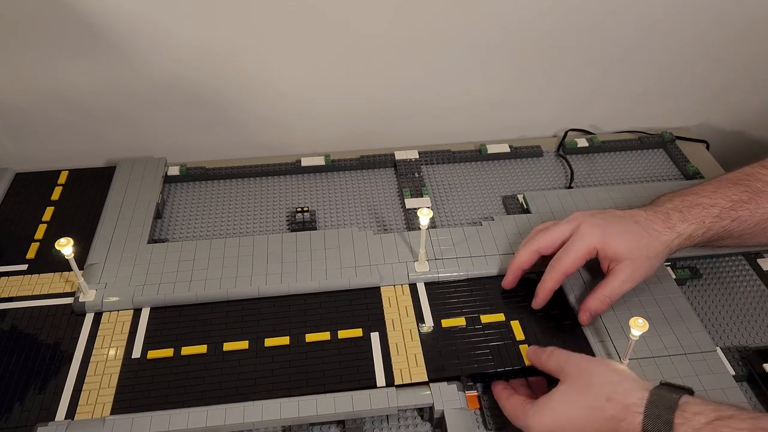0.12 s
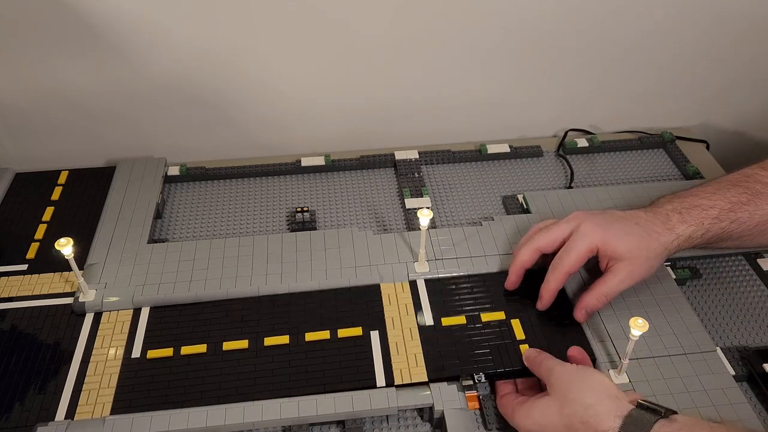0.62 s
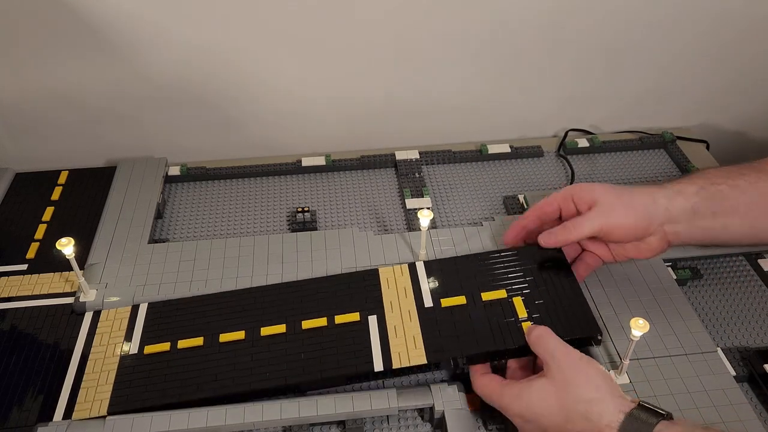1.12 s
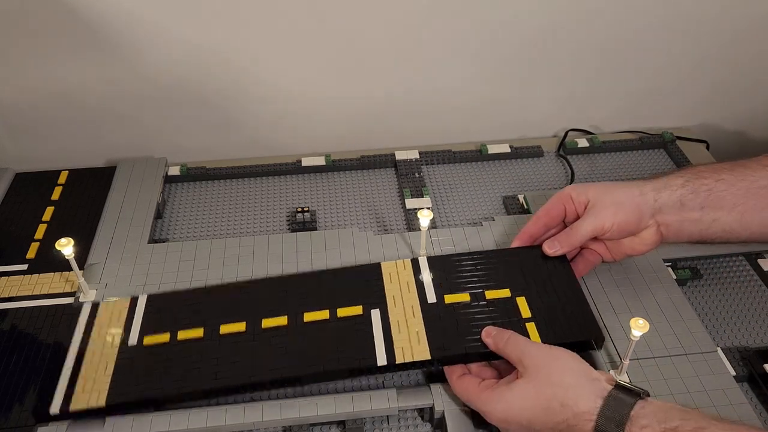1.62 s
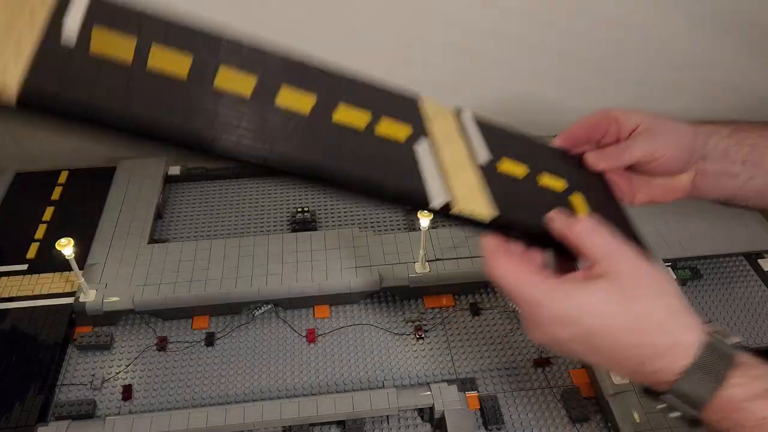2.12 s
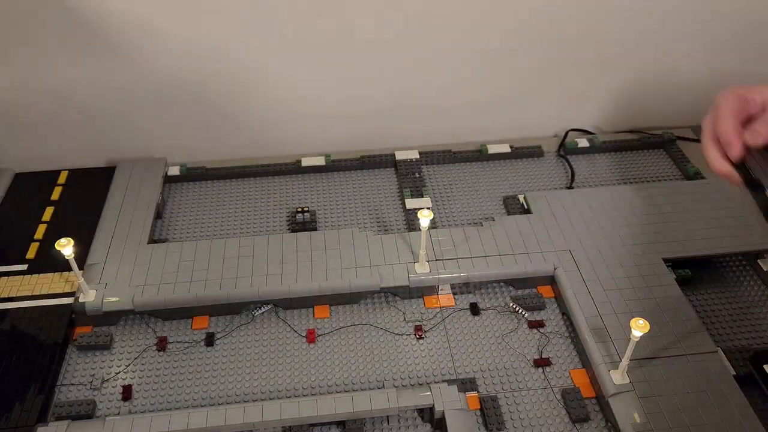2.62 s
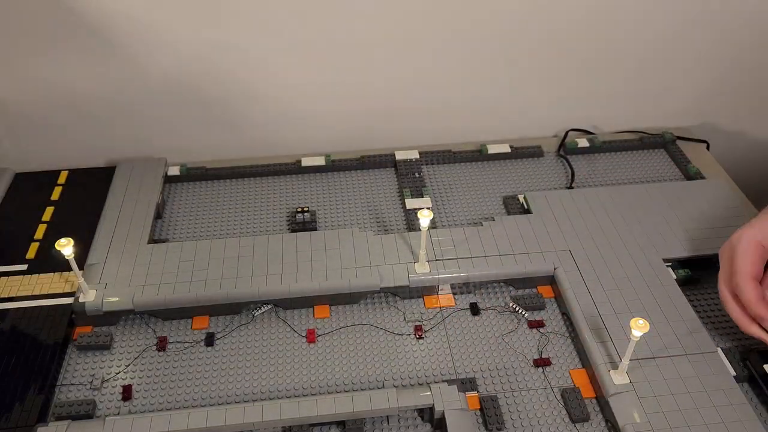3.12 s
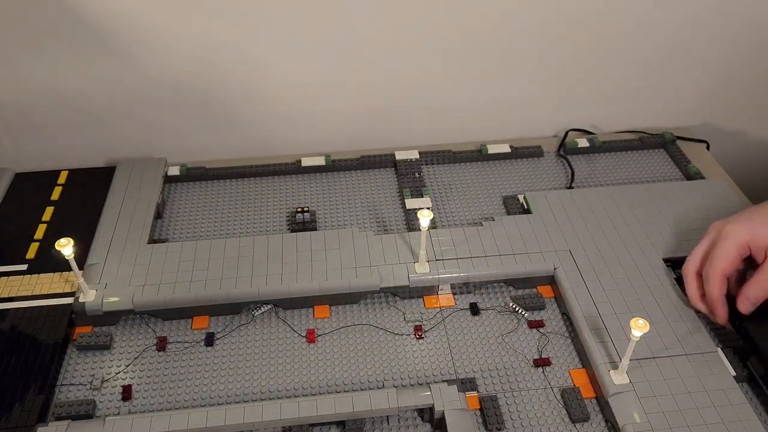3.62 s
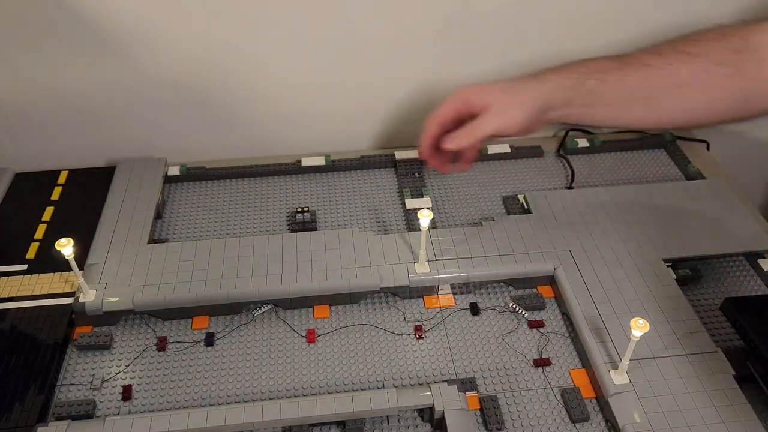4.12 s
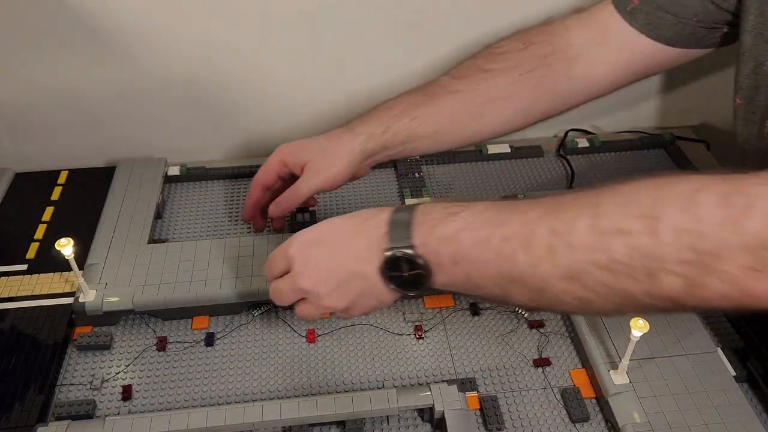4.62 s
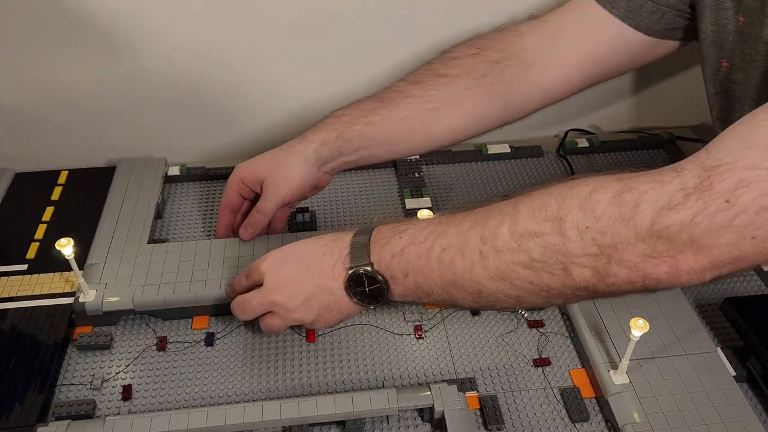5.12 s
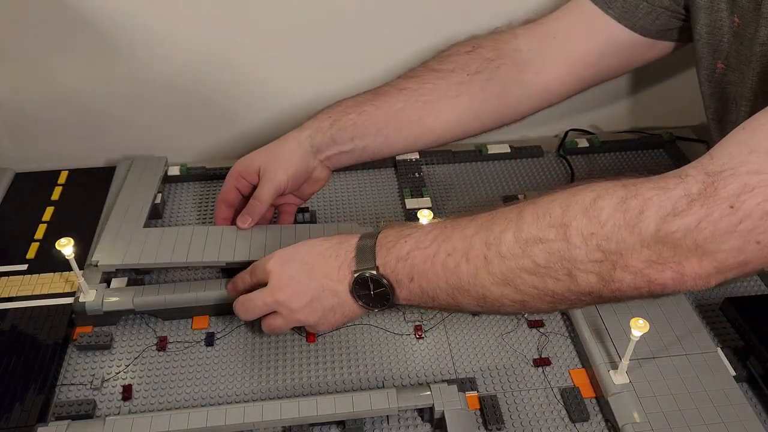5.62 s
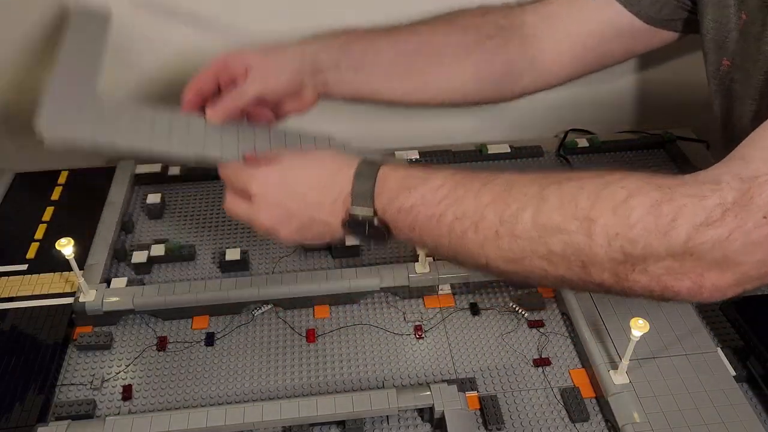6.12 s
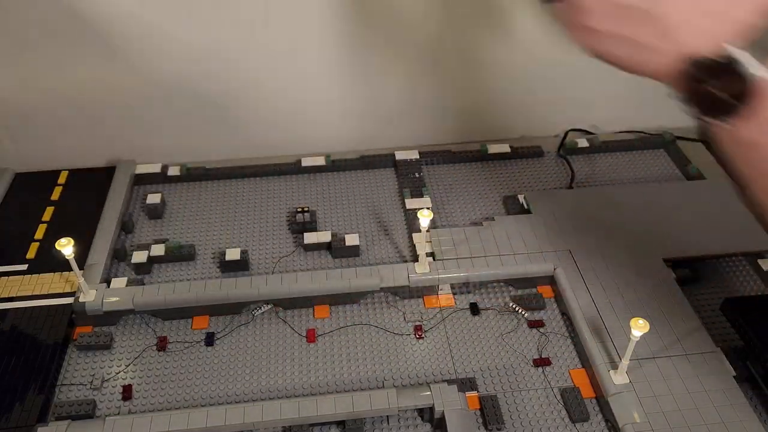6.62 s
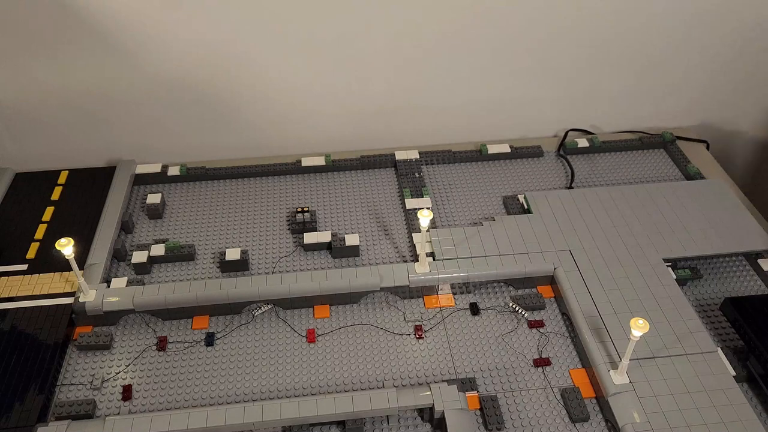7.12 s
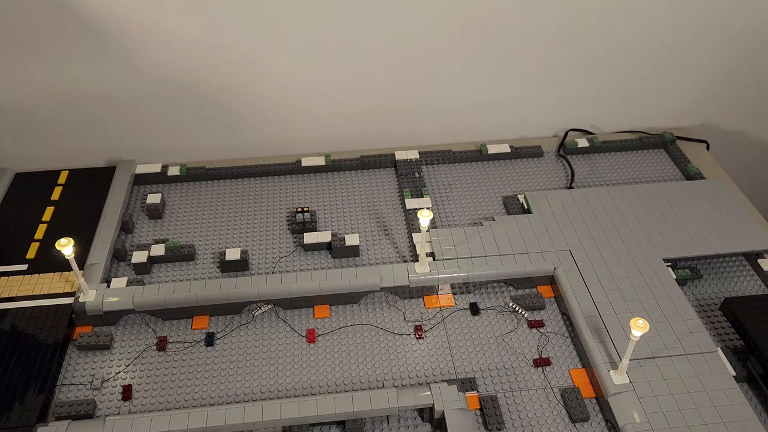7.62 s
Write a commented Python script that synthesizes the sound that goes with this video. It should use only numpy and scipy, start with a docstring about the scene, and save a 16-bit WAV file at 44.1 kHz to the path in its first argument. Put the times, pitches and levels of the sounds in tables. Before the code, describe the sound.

Close in a small quiet room, hands pry a long plastic brick plate off a studded base with small clicks, creaks and a sharp snap. After a soft sleeve rustle, it is set down nearby with a loud hollow clatter and low table boom. A pause, then a second plate works loose with duller clacks and scrapes, leaving faint rustle and low room rumble.

```python
"""In a small room, two hands lift long plastic building plates off a studded base on a table and set
one down nearby. Each touch is a burst of small blows that excites the damped modes of plates, bricks,
studs and table; longer bursts that catch quickly and fade slowly make scrapes. Sine tones stand out of
some contacts and give the table boom. A squeak is narrow-band noise; shaped noise gives rustling
sleeves and a low room rumble."""
import sys
import numpy as np
from scipy import signal
from scipy.fft import rfft, irfft
from scipy.io import wavfile
from scipy.ndimage import uniform_filter1d, map_coordinates

SR = 44100
rng = np.random.default_rng(int(sys.argv[2]) if len(sys.argv) > 2 else 0)


def makeup_ratio(level_db):
    """Linear amplitude ratio for a level in decibels (20 dB per factor of ten)."""
    decades = np.asarray(level_db, float) / 20
    return 10 ** decades


def transcribe(signal):
    """Save signal, clipped to [-1, 1], as a 16-bit WAV file at the path in sys.argv[1]."""
    frames = np.atleast_2d(signal).T
    limited = np.clip(frames, -1, 1)
    pcm = np.round(limited * 32767).astype(np.int16)
    wavfile.write(sys.argv[1], SR, pcm)


N = 342216

# Short contacts: (time [s], plate knock [dB], brick clack over knock [dB], stud tick over knock [dB],
# table thump [dB], pitch favoured by the struck spot [Hz])
CONTACTS = [(0.032, -74, -18.5, -17, -61, 900), (0.043, -41, -4, -25, -47, 664),
            (0.059, -50.5, -15, -13, -52.5, 800), (0.091, -47, -4, 7, -54, 7500),
            (0.095, -33.5, 1.5, -2.5, -43.5, 1260), (0.101, -36, 0, -0.5, -50.5, 3220),
            (0.334, -61, -8, -19, -55, 3690), (0.515, -68.5, 3.5, -5, -59, 1510),
            (0.586, -52, -11, -39, -51, 585), (0.594, -51, -7, -27, -60, 2000),
            (0.629, -46.5, -10, -22, -54.5, 960), (0.648, -45, 8, 2, -47, 493),
            (0.811, -62, 3.5, -5, -64, 2010), (0.856, -63.5, 0, 0.5, -63, 1400),
            (0.892, -64.5, 1, -10, -75, 1026), (0.905, -58, 4, 5, -76, 4400),
            (0.934, -53.5, -6, 0.5, -60.5, 2500), (0.956, -48.5, -6, 4, -53, 3200),
            (1.018, -56, -1.5, 7, -50, 1400), (1.072, -59, -12, 9, -60.5, 700),
            (1.23, -54.5, -12, -6, -57.5, 1600), (1.246, -57, -5, -5, -49, 1200),
            (1.256, -47.5, -10, -11.5, -51, 130), (1.352, -60, -0.5, 4, -75, 3670),
            (1.423, -52, -24, -10, -57, 715), (1.433, -59.5, 7.5, 9.5, -72.5, 2760),
            (1.443, -60, 6.5, 14.5, -56, 4150), (1.495, -56, -23, -23.5, -60, 600),
            (1.518, -62.5, -6, 3.5, -59.5, 1820), (1.582, -48, -15.5, -10, -70, 600),
            (1.59, -48.5, 6, -8.5, -63, 3570), (1.591, -26, -38, -18, -31, 860),
            (1.611, -31, -7, -19.5, -47, 740), (1.625, -35, 1, -5.5, -36, 1090),
            (1.653, -36.5, -15.5, -11.5, -43.5, 1150), (2.198, -77.5, 8, 6, -55, 6760),
            (2.378, -63.5, 0, 15, -62, 1960), (2.383, -63.5, -1.5, 14, -73, 4600),
            (2.49, -65.5, 4.5, -3, -72, 4730), (2.553, -63, 0.5, 5.5, -71, 1920),
            (3.262, -31.5, -4, -11.5, -36.5, 1000), (3.274, -30.5, -25.5, -20, -26, 1110),
            (3.29, -38, -15.5, -28, -39.5, 890), (3.32, -23, -11, -20.5, -29, 1300),
            (3.328, -28, -13.5, -15.5, -43, 12800), (3.353, -26.5, -18.5, -21.5, -33, 1900),
            (3.36, -26.5, -10.5, -16, -29, 1270), (3.365, -37, -5, -3.5, -42, 14000),
            (3.372, -26, -9.5, -22.5, -31, 550), (3.385, -37, -17.5, -25.5, -24.5, 885),
            (3.4, -35.5, -7.5, -18.5, -40, 1220), (3.533, -33.5, -14, -31, -38, 734),
            (3.541, -35, -16, -18, -43, 3440), (3.55, -30.5, -28, -33, -55, 1520),
            (3.557, -36, -33, -32.5, -37, 960), (3.586, -39.5, -19.5, -24.5, -40.5, 970),
            (3.425, -40, -7, -27, -48, 1210), (3.61, -45, -25, -30, -40.5, 800),
            (4.121, -54.5, -11, -14.5, -61, 547), (5.286, -56.5, -34, -24, -50, 720),
            (5.357, -53.5, -23.5, -2, -40.5, 1000), (5.373, -42, -5, -27, -51, 1100),
            (5.388, -38.5, -23, -31, -44, 595), (5.408, -45.5, 0.5, -13, -43, 1500),
            (5.434, -46.5, -2, -11.5, -70.5, 875), (5.464, -32, -5, -5.5, -60, 1240),
            (5.472, -35.5, -22, -12.5, -64, 1220), (5.509, -46.5, -4, -6.5, -48, 970),
            (5.655, -55.5, -33.5, -40, -59, 1320), (5.68, -42, -18.5, -23, -49, 1820),
            (5.688, -38.5, -24, -27, -47, 513), (5.708, -41, -9.5, -5, -45.5, 1460),
            (5.749, -44, -33, -17, -51, 710), (6.611, -59.5, 3, -2, -70, 2260),
            (6.615, -68, 15, 9, -77, 5400)]
# Plates sliding and creaking against studs: (start [s], length [s], knock [dB], clack over knock [dB],
# tick over knock [dB], favoured pitch [Hz])
SCRAPES = [(0, 0.056, -42.5, -22, -17.5, 1200), (0.597, 0.14, -40.5, -13, -20, 750),
           (1.079, 0.037, -49.5, -14, -9.5, 4540), (1.181, 0.1, -44, -24, -27, 1900),
           (1.633, 0.06, -34, -3, -16, 2800), (2.231, 0.12, -61, 7, 7.5, 5420),
           (2.656, 0.14, -64, 1.5, 5, 2050), (2.982, 0.18, -64, 6.5, -3, 1460),
           (5.249, 0.043, -61.5, -45, -22, 1244), (5.305, 0.043, -54, -16.5, -24, 1150),
           (5.346, 0.16, -42.5, -18, -41, 1200), (5.481, 0.092, -48, -25, -28, 1400),
           (5.716, 0.055, -39.5, -18.5, -33, 1800)]
# Damped modes of each body: (frequency [Hz], relative level [dB], nominal 60 dB decay time [s])
PLATE_MODES = [(346, 3.5, 0.087), (495, 6.9, 0.035), (575, 4.3, 0.043), (667.6, 4.5, 0.072),
               (755, 1.8, 0.038), (861, 9, 0.012), (998, 8.5, 0.035), (1126, 8, 0.02), (1430, 8.1, 0.016)]
BRICK_MODES = [(1560, 10, 0.022), (1705, 10.5, 0.014), (2113, 12, 0.022), (2420, 2, 0.018),
               (2746, 3, 0.018), (3200, 9, 0.016), (3606, 13, 0.0069), (4370, 3, 0.014), (4810, 0, 0.014)]
STUD_MODES = [(5070, 17, 0.00086), (6020, 1, 0.0017), (7660, 6, 0.005), (9000, 13.7, 0.0018),
              (10200, 14.7, 0.0019), (13130, 11, 0.0079), (14600, 14, 0.0018)]
TABLE_MODES = [(53.3, -21, 0.3), (131.45, 1, 0.22), (227.4, -8, 0.15), (152.7, -2.5, 0.1)]
# Single tones that stand out of a contact, short or long:
# (time [s], frequency [Hz], level before decay [dB], 60 dB decay time [s])
SINGLE_TONES = [(0.097, 7630, -47, 0.32), (1.593, 545, -22, 0.034), (2.335, 331, -53, 0.15),
                (2.378, 1050, -52.5, 0.18), (2.508, 1047, -58, 0.15), (3.322, 1457, -28, 0.018),
                (4.125, 1430, -66, 0.35), (5.288, 746, -53, 0.19), (5.408, 222.5, -39, 0.14),
                (5.4647, 1210, -31, 0.017), (5.662, 705, -49, 0.1), (5.712, 707, -38, 0.14)]
# A faint wavering squeak: (time [s], centre frequency [Hz], level [dB])
SQUEAK = [(6.25, 1344, -91), (6.28, 1370, -77), (6.42, 1392, -76.5), (6.47, 1395, -80), (6.6, 1390, -90),
          (6.68, 1427, -83), (6.9, 1370, -93)]
# Table top booming while the long plate settles on it: (time [s], frequency [Hz], rms level [dB])
BOOM = [(3.258, 129.7, -46.5), (3.278, 131, -33), (3.344, 130.8, -36), (3.372, 129.5, -19),
        (3.394, 123.4, -52), (3.432, 124, -30.5), (3.448, 120.3, -46), (3.48, 124.6, -33.5),
        (3.514, 125, -38), (3.524, 123.3, -34), (3.55, 129.0, -49), (3.568, 132.1, -33), (3.646, 133, -52),
        (3.668, 129.9, -43), (3.75, 129, -66), (3.76, 129.9, -59)]
# Stereo position of the hands: (time [s], lag of left behind right [samples], left over right [dB])
HANDS = [(0, 0, 0), (0.6, -7, 1), (1.7, -6.5, 5.5), (2.3, 18.5, -2.5), (4.6, 12, -7.5), (5.3, 2.5, 4),
         (6, 0, 4), (6.6, 9.5, -9.5), (7.7, 10.5, 5)]
# Reverberation: (frequency [Hz], 60 dB decay time [s])
ROOM_DECAY = [(100, 0.61), (260, 0.63), (700, 0.31), (1840, 0.4), (4850, 0.35), (12800, 0.2)]
# Early answer of near surfaces: (frequency [Hz], level over the tail [dB])
EARLY = [(300, -2), (1500, 6.5), (5000, 17), (12000, 3)]
# More room in the sound as the plates are further from the listening point: (time [s], level [dB])
WET = [(0.3, 2), (0.75, -0.5), (0.899, -2), (1.4, -5), (1.58, -0.5), (2.2, -1.5), (2.7, 1), (3.2, 0.5),
       (4.5, -3), (5.2, 0), (6.6, 0)]
# Left-right likeness of diffuse sound: (frequency [Hz], correlation [1])
LIKENESS = [(60, 0.97), (180, 0.88), (550, 0.37), (1650, 0.0256), (4970, 0.1), (15000, 0.13)]
# Sleeves and skin following the speed of the arms: (time [s], level [dB], tilt [dB per octave])
RUSTLE = [(0.0, -55, -6), (0.12, -65.5, 5), (0.3, -75, -3.5), (0.6, -101, -6), (0.85, -74.5, 5),
          (1.5, -65, -2.5), (1.85, -104, -9.5), (2.2, -95, 17.5), (2.399, -64.5, -2.5), (2.9, -64, -1.5),
          (3.15, -73.5, -5.5), (3.95, -75, -2), (4.25, -64.5, -2), (4.678, -63, 3), (4.95, -75.5, -1),
          (6.1, -81.5, 0), (6.6, -67.5, 0), (6.95, -70.5, -1), (7.4, -78.5, -1.5)]
# Spectrum of the rustle before tilt: (frequency [Hz], relative density [dB per Hz])
RUSTLE_COLOUR = [(240, -66), (400, -7), (474, -38), (626, -37.5), (777, -26), (1420, 4), (2220, -2.5),
                 (7510, 1), (16000, -12.5)]
# Spectrum of the rumble: (frequency [Hz], relative density [dB per Hz])
RUMBLE_COLOUR = [(12, -66), (20, -25), (40, -10), (60, -0.5), (86, -7), (116, -3), (146, -26), (228, -17.5),
                 (262, -26.5), (527, -31.5), (976, -35), (1610, -38), (2820, -42), (7730, -50.5),
                 (16000, -76)]
# Slow drift of the rumble: (time [s], relative level [dB])
RUMBLE_SWELL = [(0.0, 1), (7.76, -3.5)]


def read(points, hz):
    """Interpolation of a spectrum at hz along a logarithmic frequency axis."""
    f, value = np.transpose(points)
    return np.interp(np.log(hz + 1), np.log(f + 1), value)


def evened(x):
    """Normalization to unit root-mean-square value."""
    return x / np.sqrt(np.mean(x ** 2) + 1e-20)


def ring(modes, starts, shapes, levels_db, spot_hz, soft_ms, spot_db, modes_db, crack_db, detune):
    """Modal excitation: a burst of small blows drives damped modes plus a dry crack across their range."""
    blows_per_s, favour_db, favour_q = 6000, 8, 2
    size = shapes.shape[1]
    hz, db, t60 = np.transpose(modes)
    happens = rng.random(shapes.shape) < blows_per_s / SR
    blows = shapes * rng.standard_normal(shapes.shape) * happens
    if size < 4096:  # the blows of a short contact together drive all frequencies evenly
        for _ in range(6):
            spectrum = rfft(blows)
            flat = irfft(spectrum / (abs(spectrum) + 1e-9), size)
            blows = flat * (shapes > 0.04 * shapes.max())
    blows /= np.linalg.norm(blows, axis=1, keepdims=True) + 1e-9

    # spot and grip weight and detune the modes afresh at each touch
    weight, shift, sign = rng.standard_normal((len(starts), len(modes), 3)).T
    length = int(t60.max() * SR) + 64
    t = np.arange(length)[:, None] / SR
    band = signal.butter(2, [0.77 * hz[0], 1.5 * hz[-1]], "band", fs=SR, output="sos")
    crack = makeup_ratio(crack_db) * signal.sosfilt(band, signal.unit_impulse(length))
    fade = makeup_ratio(db - 60 * t / t60) / np.sqrt(len(modes))

    out = np.zeros(N + size + length)
    for i, s in enumerate(starts):
        favoured = signal.lfilter(*signal.iirpeak(spot_hz[i], favour_q, SR), blows[i])
        force = blows[i] + makeup_ratio(favour_db) * favoured
        tones = fade * np.sin(2 * np.pi * hz * (1 + detune * shift[:, i]) * t)
        gains = makeup_ratio(modes_db + spot_db * weight[:, i]) * np.sign(sign[:, i])
        body = crack + tones @ gains
        out[round(s * SR):][:size + length - 1] += makeup_ratio(levels_db[i]) * signal.fftconvolve(force, body)
    push = np.hanning(int(soft_ms * SR / 1000) + 3)  # a soft contact lasts longer
    return signal.oaconvolve(out, push / push.sum())[:N]


def plastic(starts, shapes, knock_db, clack_db, tick_db, spot_hz):
    """Superposition of modes: plate, bricks and studs all ring under each touch."""
    plate = ring(PLATE_MODES, starts, shapes, knock_db, spot_hz, soft_ms=0.27, spot_db=2.16,
                 modes_db=-10.0, crack_db=21.34, detune=0.04)
    brick = ring(BRICK_MODES, starts, shapes, knock_db + clack_db, spot_hz, soft_ms=0.05, spot_db=4.2,
                 modes_db=-13.5, crack_db=23.4, detune=0.058)
    stud = ring(STUD_MODES, starts, shapes, knock_db + tick_db, spot_hz, soft_ms=0.01, spot_db=4.1,
                modes_db=-0.39, crack_db=13.5, detune=0.04)
    return plate + brick + stud


def contact_shapes(count):
    """Contact envelope: a short burst of small blows with a soft onset and a quick decay."""
    rise_ms, decay_ms = 2.47, 2.99
    ms = np.arange(2048) * 1000 / SR
    return np.exp(-ms / decay_ms) * (1 - np.exp(-ms / rise_ms)) ** 2 * np.ones((count, 1))


def scrapes():
    """Stick-slip friction: each slide catches quickly, slips unevenly and lets go slowly."""
    start, length, *slide = np.transpose(SCRAPES)
    progress = np.minimum(np.arange(8192) / SR / length[:, None], 1)
    arch = np.sin(np.pi * progress ** 0.42)
    slips_db = 3.9 * evened(uniform_filter1d(rng.standard_normal(arch.shape), size=130))
    return plastic(start, arch * makeup_ratio(slips_db), *slide)


def single_tones():
    """Exponential decay: single tones, short or long, stand out of a contact and waver a little in level."""
    rise_cycles, waver_db = 0.77, 2.5
    t, out = np.arange(SR // 2) / SR, np.zeros(N)
    for s, hz, db, t60 in SINGLE_TONES:
        envelope = makeup_ratio(db - 60 * t / t60) * np.minimum(t * hz / rise_cycles, 1)
        tone = envelope * np.sin(2 * np.pi * (hz * t + rng.random()))
        waver = evened(uniform_filter1d(rng.standard_normal(len(t)), size=300))
        out[round(s * SR):][:len(t)] += tone * makeup_ratio(waver_db * waver)
    return out


def squeak():
    """Narrow-band noise: slow complex noise modulates a carrier of drifting frequency."""
    width_hz = 120
    s, hz, db = np.transpose(SQUEAK)
    t, r = np.arange(N) / SR, np.exp(-np.pi * width_hz / SR)
    noise = rng.standard_normal(N) + 1j * rng.standard_normal(N)
    slow = signal.lfilter([1], [1, -2 * r, r * r], noise)
    carrier = np.exp(2j * np.pi * np.cumsum(np.interp(t, s, hz)) / SR)
    tone = evened((slow * carrier).real)
    return tone * makeup_ratio(np.interp(t, s, db)) * (t > s[0]) * (t < s[-1])


def table_thump(starts, shapes, thump_db, spot_hz):
    """Structure-borne excitation: each contact also drives the low modes of the table."""
    return ring(TABLE_MODES, starts, shapes, thump_db, spot_hz, soft_ms=0.69, spot_db=0.7,
                modes_db=3.9, crack_db=4.2, detune=0.017)


def boom():
    """Lowest drum mode of the table top: a sine whose pitch and level shift as the plate pushes and damps it."""
    s, hz, db = np.transpose(BOOM)
    t = np.arange(N) / SR
    phase = 2 * np.pi * np.cumsum(np.interp(t, s, hz)) / SR
    return np.sqrt(2) * makeup_ratio(np.interp(t, s, db, -120, -120)) * np.sin(phase)


def placed(x):
    """Stereo localization: direct sound differs in arrival time and level between the channels."""
    s, lag, pan_db = np.transpose(HANDS)
    n = np.arange(N)
    lag, pan_db = np.interp(n / SR, s, lag), np.interp(n / SR, s, pan_db)
    left = map_coordinates(x, [n - lag / 2]) * makeup_ratio(pan_db / 2)
    right = map_coordinates(x, [n + lag / 2]) / makeup_ratio(pan_db / 2)
    return np.array([left, right])


def room(x):
    """Reverberation: dense echoes of random sign, each frequency band decaying at its own rate."""
    early_s = 0.0023  # time for the early answer to fall to 1/e
    taps = np.zeros((2, SR))
    at = np.arange(160, SR - 20, 20) + rng.integers(0, 20, (2, (SR - 161) // 20))
    np.put_along_axis(taps, at, rng.choice([-1., 1.], at.shape), 1)
    hz, t, z = signal.stft(taps, SR, nperseg=256)
    same = np.clip(read(LIKENESS, hz), -1, 1)[:, None]  # long waves reach both channels alike
    z[1] = same * z[0] + np.sqrt(1 - same ** 2) * z[1]
    decay = makeup_ratio(-60 * t / read(ROOM_DECAY, hz)[:, None])
    early = 1 + makeup_ratio(read(EARLY, hz))[:, None] * np.exp(-t / early_s)
    tail = signal.istft(z * decay * early, SR, nperseg=256)[1]
    return signal.fftconvolve(x[None], tail / np.linalg.norm(tail[0]), axes=1)[:, :N]


def hiss(field_db, patchy_db, flicker_db):
    """Partly coherent stereo noise: random short-time spectra with patches and broadband flicker."""
    hz, frames = np.fft.rfftfreq(1024, 1 / SR), N // 256 + 5
    a, b, c, d, patches = rng.standard_normal((frames, 513, 5)).T
    patches = uniform_filter1d(uniform_filter1d(patches, size=12, axis=0), size=10, axis=1)
    flicker = evened(uniform_filter1d(rng.standard_normal(frames), size=3))
    same = np.clip(read(LIKENESS, hz), -1, 1)[:, None]
    left = a + 1j * b
    right = same * left + np.sqrt(1 - same ** 2) * (c + 1j * d)
    level_db = field_db(hz[:, None], np.arange(frames) * 256 / SR)
    level_db = level_db + patchy_db * evened(patches) + flicker_db * flicker
    z = np.array([left, right]) * makeup_ratio(level_db)
    return signal.istft(z, nperseg=1024, noverlap=768)[1][:, :N]


def rustle():
    """Friction noise: cloth and skin rub as the arms move, with changing level and spectral tilt."""
    s, db, tilt = np.transpose(RUSTLE)

    def field_db(hz, t):
        return read(RUSTLE_COLOUR, hz) + np.interp(t, s, tilt) * np.log2((hz + 1) / 5000)

    sound = hiss(field_db, patchy_db=2.5, flicker_db=0.86)
    return evened(sound) * makeup_ratio(np.interp(np.arange(N) / SR, s, db))


def rumble():
    """Stationary background noise: the low hum of the house, drifting slowly in level."""
    def field_db(hz, t):
        return read(RUMBLE_COLOUR, hz) + np.interp(t, *np.transpose(RUMBLE_SWELL))

    return makeup_ratio(-60.5) * evened(hiss(field_db, patchy_db=0.7, flicker_db=0.91))


def scene():
    """Superposition of direct sound, reverberation and background noise."""
    s, knock_db, clack_db, tick_db, thump_db, spot_hz = np.transpose(CONTACTS)
    shapes = contact_shapes(len(s))
    plates = plastic(s, shapes, knock_db, clack_db, tick_db, spot_hz)
    plates = plates + scrapes() + single_tones() + squeak()
    table = table_thump(s, shapes, thump_db, spot_hz)
    wet = makeup_ratio(np.interp(np.arange(N) / SR, *np.transpose(WET)))
    direct = placed(plates) + table + boom()
    reverberant = makeup_ratio(-2.5) * room(plates * wet) + makeup_ratio(-6.0) * room(table)
    return direct + reverberant + rustle() + rumble()


def band_limit(x):
    """A steep low-pass at the top of the band."""
    return signal.sosfilt(signal.butter(12, 16000, fs=SR, output="sos"), x)


def record(dry):
    """Linear capture: the sound field is taken at unit gain."""
    return band_limit(dry)


dry = scene()
out = record(dry)
transcribe(out)
```